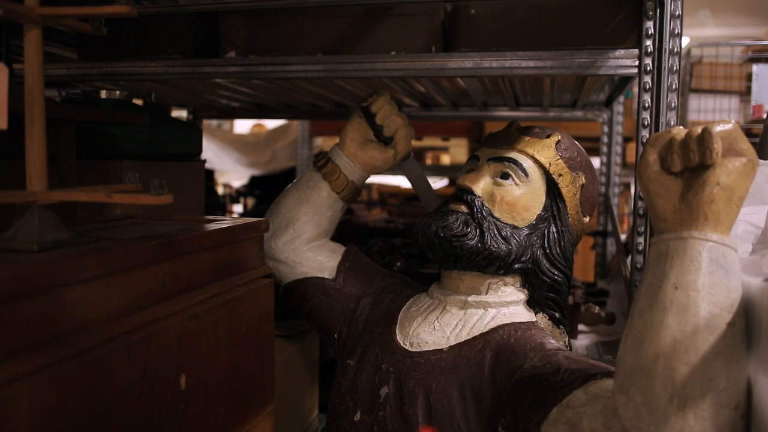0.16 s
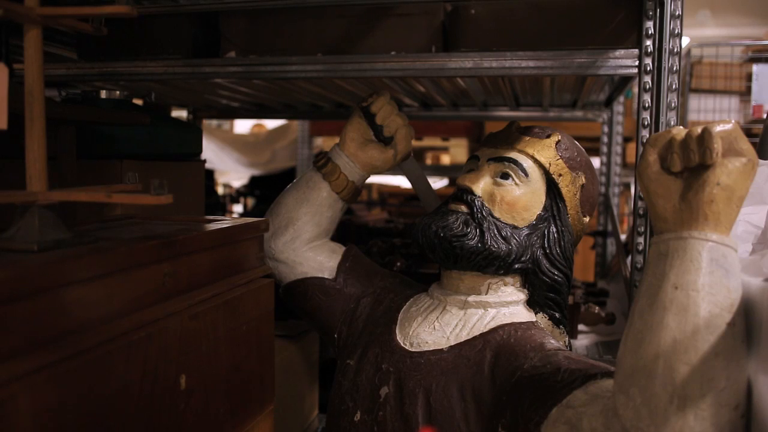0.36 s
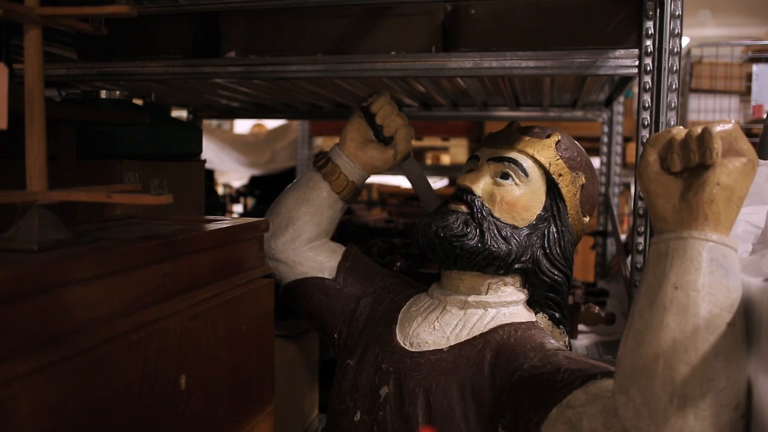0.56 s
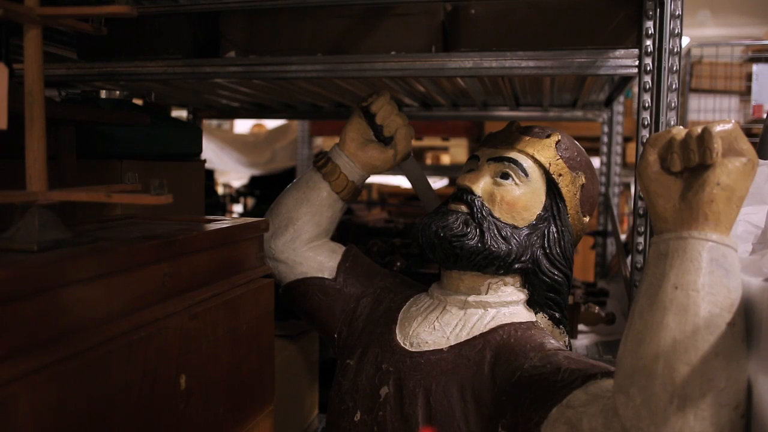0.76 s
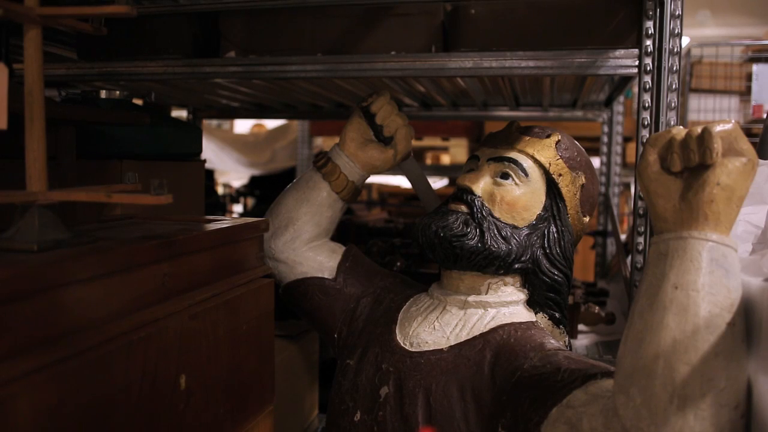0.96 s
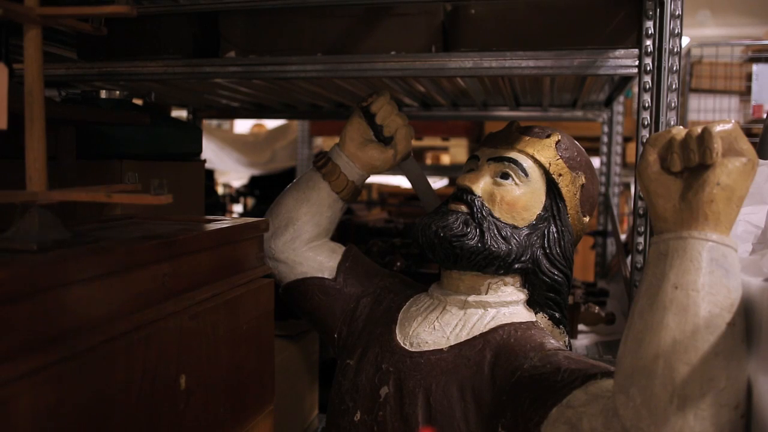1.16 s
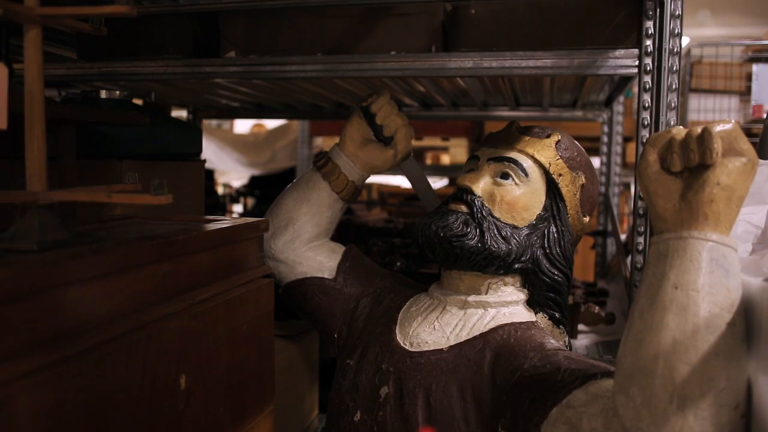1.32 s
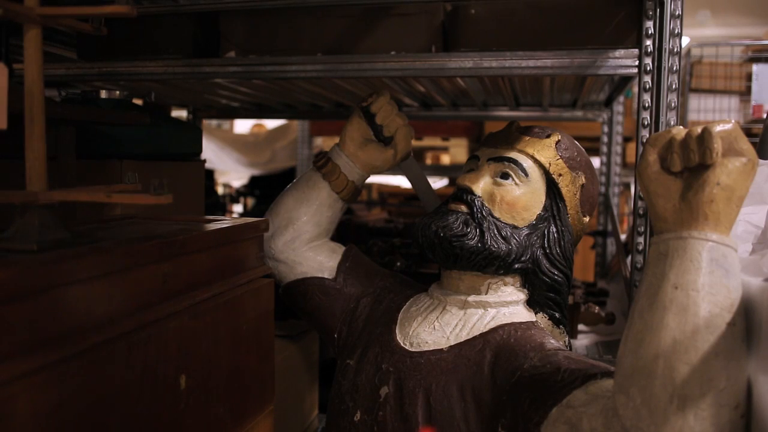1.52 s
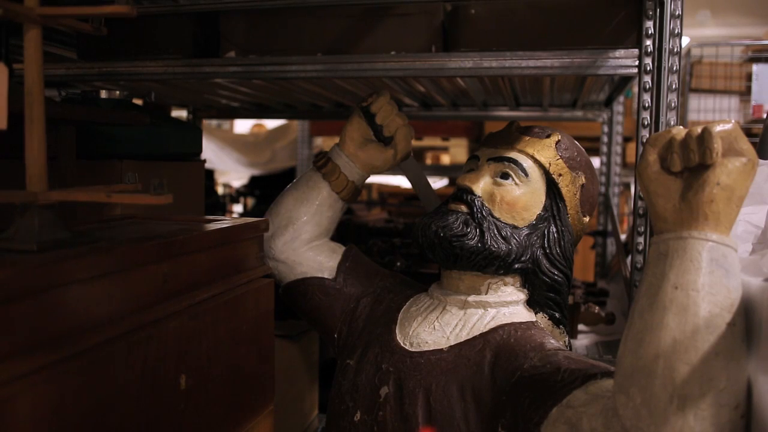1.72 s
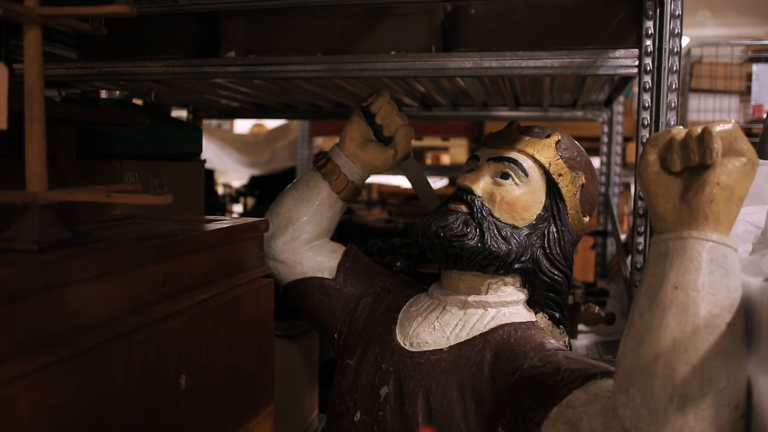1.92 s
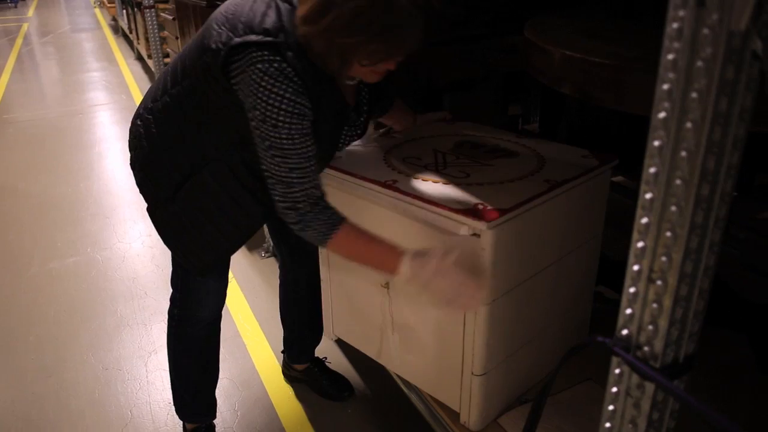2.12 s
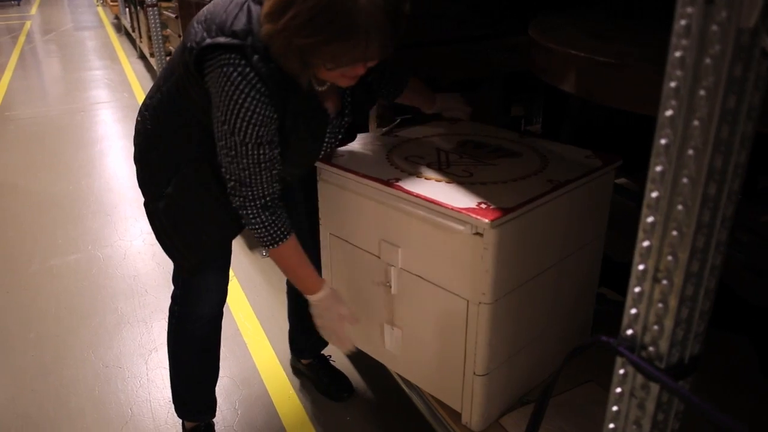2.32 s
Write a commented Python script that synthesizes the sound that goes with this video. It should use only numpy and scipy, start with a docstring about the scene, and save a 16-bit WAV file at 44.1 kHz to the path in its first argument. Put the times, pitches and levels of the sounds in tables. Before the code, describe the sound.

A heavy wooden cabinet drags across a shelf. Cloth rustles softly from 0.1 to 0.85 s over quiet room air; small dull bumps cluster around 1.0-1.27 s. At 1.28 s it cracks loose, then grinds with hollow, gritty, juddering scraping, loudest near 1.85 s, stopping about 2.15 s. A short room tail and faint cloth rustle follow, over growing low rumble and a soft, deep, regular thump.

```python
"""Heavy cabinet dragged across a shelf

Under it lie the room air, shaped noise with a rising low part, and a growing deep sine with a regular thump.
Cloth rustles in fine filtered clicks; small bumps are short dull rings with a noisy edge.
The feet break loose with a crack of shelf modes and a spray of splinter grains, then grind, swell and stop:
random slips shake the modes of the wooden cabinet, with grit on top, and a quiet storage room answers."""
import sys
import numpy as np
from scipy import signal
from scipy.fft import rfft, irfft
from scipy.io import wavfile
from scipy.ndimage import uniform_filter1d

SR = 44100
rng = np.random.default_rng(int(sys.argv[2]) if len(sys.argv) > 2 else 0)


def level_to_linear(level):
    """Convert decibel levels to linear amplitude factors, elementwise."""
    exponent = np.asarray(level, float) / 20
    return 10 ** exponent


def store_pcm(level_fs):
    """Save levels as 16-bit WAV."""
    pcm = np.round(np.clip(level_fs, -1, 1) * 32767).astype(np.int16)
    wavfile.write(sys.argv[1], SR, np.atleast_2d(pcm).T)


N = 109368
TIME = np.arange(N) / SR


def evened(x):
    """Scales to rms 1."""
    return x / np.sqrt(np.mean(x ** 2) + 1e-20)


def rfft_hz(size):
    """Bin frequencies."""
    return np.fft.rfftfreq(size, 1 / SR)


def read(points, hz):
    """Reads a table on a log-frequency axis."""
    f, value = np.transpose(points)
    return np.interp(np.log(hz + 1), np.log(f + 1), value)


def curve(rows, column=1):
    """One column of a table over time, -120 outside it."""
    rows = np.array(rows)
    return np.interp(TIME, rows[:, 0], rows[:, column], -120, -120)


def loudest(tables):
    """The louder of several level curves at each moment."""
    return np.max([curve(rows) for rows in tables], axis=0)


def add(mix, start_s, sound):
    """Mixes a sound in at start_s."""
    part = mix[round(start_s * SR):][:len(sound)]
    part += sound[:len(part)]


def colour(x, spectrum):
    """Causal minimum-phase filter with the given spectrum."""
    log_gain = np.log(level_to_linear(np.maximum(read(spectrum, rfft_hz(8192)), -100)))
    # folding the cepstrum onto positive time makes the filter causal
    cepstrum = irfft(log_gain)
    cepstrum[1:4096] *= 2
    cepstrum[4097:] = 0
    taps = irfft(np.exp(rfft(cepstrum)))[:3072]
    taps = taps.reshape((1,) * (x.ndim - 1) + (-1,))
    return signal.oaconvolve(x, taps, axes=-1)[..., :N]


def ring(modes):
    """Impulse response of each mode: a sine that dies exponentially."""
    t = TIME[:SR // 4]
    return np.array([level_to_linear(db - 60 * t / t60) * np.sin(2 * np.pi * hz * t) for hz, db, t60 in modes])


def grains(per_s, spread_db):
    """Random clicks of both signs; a few are large."""
    chance = rng.random(N)
    boost = np.minimum(rng.exponential(1, N), 5)
    size = rng.standard_normal(N)
    return (chance < per_s / SR) * level_to_linear(spread_db * boost) * size


def wander(seconds):
    """Random curve of rms 1 that shakes at about the given time scale."""
    width = max(round(seconds * SR), 2)
    slow = uniform_filter1d(uniform_filter1d(rng.standard_normal(N), width), width)
    return evened(slow - uniform_filter1d(slow, 5 * width))


# tone of the room air: pitch_hz, level_db (relative)
AIR_TONE = [(20, -25), (50, -0.5), (80, -3.5), (105, -5), (160, -0.5), (210, -7), (250, -10.5), (300, -8),
            (400, -12), (700, -14.5), (2300, -17.5), (6000, -24), (15700, -28)]
# left-right likeness of the air: pitch_hz, likeness (1 = same in both ears)
AIR_LIKENESS = [(60, 0.84), (240, 0.34), (950, 0.46), (3770, 0.056), (15000, 0.034)]
# rise of the low room air, fading out above about 1500 Hz: time_s, gain_db
AIR_RUMBLE = [(0, 0.5), (.4, 2.5), (.9, 5), (2.2, 11), (2.48, 9.5)]
AIR_DB = -67  # before the rumble rises


def air():
    """Room air: partly shared stereo noise with faint patches in time and pitch; its low part drifts."""
    frames, hz = N // 512 + 5, rfft_hz(2048)
    a, b, c, d, patches = rng.standard_normal((frames, 1025, 5)).T
    patches = evened(uniform_filter1d(uniform_filter1d(patches, 20, 0), 6, 1))
    same = np.clip(read(AIR_LIKENESS, hz), -1, 1)[:, None]
    left = a + 1j * b
    right = same * left + np.sqrt(1 - same ** 2) * (c + 1j * d)
    z = np.array([left, right])
    z *= level_to_linear(read(AIR_TONE, hz)[:, None] + 1.6 * patches)
    scale = level_to_linear(AIR_DB) / np.std(signal.istft(z, nperseg=2048, noverlap=1536)[1])
    drift_db = np.interp(np.arange(frames) * 512 / SR, *np.transpose(AIR_RUMBLE))
    z *= level_to_linear(drift_db / (1 + (hz[:, None] / 1500) ** 2))
    noise = signal.istft(z, nperseg=2048, noverlap=1536)[1][:, :N]
    return scale * noise * level_to_linear([[-.6], [.6]])  # leans right


# growth of the hum: time_s, level_db (rms of the tone before it leans right)
HUM_LEVEL = [(0, -71), (.4, -67.5), (1.2, -61), (2.48, -59)]
HUM_HZ = 35.
THUMP_FIRST_S, THUMP_EVERY_S = .266, .3405
THUMP_HZ, THUMP_S, THUMP_DB = 24, .013, 6  # pitch, bell-curve width, gain over the hum before its sine


def hum():
    """Hum: a steady deep sine and a soft bell-shaped thump at a regular pace, both growing."""
    # time from the nearest thump
    near = (TIME - THUMP_FIRST_S + THUMP_EVERY_S / 2) % THUMP_EVERY_S - THUMP_EVERY_S / 2
    bell = np.exp(-.5 * (near / THUMP_S) ** 2)
    thump = level_to_linear(THUMP_DB) * bell * np.sin(2 * np.pi * THUMP_HZ * near)
    tone = np.sin(2 * np.pi * HUM_HZ * TIME)
    level = level_to_linear(np.interp(TIME, *np.transpose(HUM_LEVEL)))
    return level * np.sqrt(2) * (tone - thump) * level_to_linear([[-1.2], [1.2]])


# rustle of the cloth, two passages: time_s, level_db
RUSTLE_LEVEL = [
    [(0.09, -73), (0.14, -65.5), (0.236, -74), (0.352, -62), (0.4, -68.5), (0.406, -82), (0.46, -67.5),
     (0.5, -64), (0.53, -75), (0.558, -73), (0.602, -66.5), (0.658, -78), (0.666, -71), (0.784, -69.5),
     (0.788, -67.5), (0.86, -107)],
    [(2.25, -71.5), (2.286, -67), (2.432, -64), (2.47, -65.5), (2.48, -65)],
]
# tone of the rustle: pitch_hz, level_db (relative)
RUSTLE_TONE = [(240, -38), (400, -5), (682, -7), (777, -12.5), (874, -9), (1240, -4.5), (9000, -15.5),
               (11700, -23.5), (19800, -120)]
# thin high hiss of the cloth, two passages: time_s, level_db
SWISH_LEVEL = [
    [(0.09, -95), (0.132, -75), (0.262, -101), (0.32, -78), (0.396, -90), (0.414, -105), (0.486, -79),
     (0.518, -95), (0.776, -85), (0.8, -91)],
    [(2.1, -80), (2.25, -74.5), (2.462, -77), (2.48, -74)],
]
# tone of the hiss: pitch_hz, level_db (relative)
SWISH_TONE = [(4000, -20.5), (6500, -4.5), (9000, -4.5), (11500, -9.5), (15000, -12.5)]
# fibres snap: start_s, level_db
FIBRE_TICKS = [(.312, -49), (0.353, -55), (.357, -49)]


def cloth():
    """Cloth: moving sleeves rub in fine grains, part shared and part wide, and a few fibres snap."""
    near = grains(5000, 3.0)
    wide = np.array([grains(7000, 2.4), grains(7000, 2.4)])
    rub = evened(near) + 1.14 * evened(wide)
    rustle = level_to_linear(loudest(RUSTLE_LEVEL)) * evened(colour(rub, RUSTLE_TONE))
    swish = level_to_linear(loudest(SWISH_LEVEL)) * evened(colour(rub, SWISH_TONE))
    ticks = np.zeros(N)
    tick = ring([(2350, 3, 0.002), (4170, -14, 0.0018)]).sum(0)
    for start_s, db in FIBRE_TICKS:
        add(ticks, start_s, level_to_linear(db) * tick)
    return (rustle + swish + ticks) * level_to_linear([[-1.5], [1.5]])


# small dull bumps: start_s, level_db, pitch_hz, t60_s, edge_db (re level)
SMALL_BUMPS = [(0.034, -42, 316, 0.012, -12), (0.053, -54.5, 440, 0.022, -19),
               (0.794, -58.5, 945, 0.061, -20), (.99, -59.5, 570, 0.066, -16),
               (1.012, -58.5, 430, 0.13, -9), (1.088, -53, 607, 0.065, -22), (1.096, -50, 580, 0.03, -28),
               (1.116, -54, 672, 0.066, -21), (1.121, -47, 383, 0.063, -25), (1.136, -55, 1087, 0.043, -24),
               (1.131, -47.5, 172, 0.061, -30), (1.15, -51, 339, 0.098, -33),
               (1.167, -52.5, 894, 0.036, -14), (1.183, -55, 334, 0.074, -15),
               (1.208, -52.5, 282, 0.027, -19), (1.269, -48, 250, 0.017, -11.5)]
# tone of their noisy edge: pitch_hz, level_db (relative)
EDGE_TONE = [(200, -1), (500, 3.5), (1500, -7.5), (4000, -13.5), (6000, -26), (12000, -54)]
EDGE_T60_S = 0.12


def bumps():
    """Bumps: each is a short dull ring with a pair of neighbouring partials and a dying noisy edge."""
    out, t = np.zeros(N), TIME[:SR // 5]
    noise = evened(colour(rng.standard_normal(N), EDGE_TONE))
    phases = rng.random((len(SMALL_BUMPS), 2))
    for (start_s, db, hz, t60, edge_db), phase in zip(SMALL_BUMPS, phases):
        tone = np.cos(2 * np.pi * hz * t)
        for ratio, p in zip((.7, 1.55), phase):
            tone += 0.24 * np.cos(2 * np.pi * (hz * ratio * t + 0.42 * p))
        body = np.minimum(t / 0.0002, 1) * level_to_linear(-60 * t / t60) * tone
        edge = level_to_linear(edge_db - 60 * t / EDGE_T60_S) * noise[round(start_s * SR):][:len(t)]
        add(out, start_s, level_to_linear(db) * (body + edge))
    return out


# the feet break loose: start_s, peak_db (of each snap alone, dry)
FOOT_SNAPS = [(1.2792, -35), (1.2816, -27.5), (1.285, -43.5), (1.291, -41), (1.304, -56)]
# modes of the shelf: pitch_hz, level_db (relative)
SHELF_MODES = [(446, -5), (670, -11), (790, -6.5), (880, -1), (965, 2.5), (1225, -2), (1330, -12),
               (1700, -6), (2100, -6.5), (2515, -5), (2900, -10), (3385, -9.5), (4155, -7.5), (4690, -2),
               (5115, -9), (5565, -16), (6050, -20), (6570, -18)]
# tone of the splinters: pitch_hz, level_db (relative)
SPLINTER_TONE = [(600, -51), (1500, 12.5), (4000, 0.5), (8000, -11), (15500, -24)]
SHELF_T60_S = .045  # at 1 kHz, shorter with the root of pitch
SNAP_RISE_S = .0012
SPRAY_DB, SPRAY_T60_S = -44.5, .15


def crack():
    """Crack: snaps ring the modes of the shelf and the first leaves a short spray of splinter grains."""
    out = np.zeros(N)
    modes = [(hz, db, SHELF_T60_S * np.sqrt(1000 / hz)) for hz, db in SHELF_MODES]
    snap = ring(modes).sum(0)
    snap *= np.minimum(TIME[:len(snap)] / SNAP_RISE_S, 1)
    for start_s, db in FOOT_SNAPS:
        add(out, start_s, level_to_linear(db) * snap / abs(snap).max())
    after = TIME - FOOT_SNAPS[0][0]
    fall = np.clip(after / 0.0014, 0, 1) * level_to_linear(SPRAY_DB - 60 * abs(after) / SPRAY_T60_S)
    return out + evened(colour(grains(12000, 2.2), SPLINTER_TONE)) * fall


FAVOUR_DB, FAVOUR_OCTAVES = 13, .11  # boost of the modes near the contact pitch, bell-curve width


def favoured(modes, rows, column):
    """Level curve of each mode: those near the pitch of the contact are shaken most."""
    centre = np.maximum(curve(rows, column=column), 100)
    levels_db = []
    for hz, _, _ in modes:
        bell = np.exp(-.5 * (np.log2(hz / centre) / FAVOUR_OCTAVES) ** 2)
        levels_db.append(curve(rows) - 8 + FAVOUR_DB * bell)
    return levels_db


SLIPS_PER_S, SLIP_SPREAD_DB = 2500, 3.5
JUDDER_DB, JUDDER_S = 1.6, .008  # quick unevenness of the slips
LUMP_DB, LUMP_S = 2.5, .025  # each mode swells and sinks on its own


def shake(modes, levels_db):
    """Each mode rings to its own train of slips, all scaled together before the level curves."""
    taps = ring(modes)
    trains = []
    for _ in taps:
        slips = grains(SLIPS_PER_S, SLIP_SPREAD_DB)
        trains.append(slips * level_to_linear(JUDDER_DB * wander(JUDDER_S) + LUMP_DB * wander(LUMP_S)))
    norm = np.sqrt(sum(np.mean(s ** 2) * np.sum(r ** 2) for s, r in zip(trains, taps)))
    return sum(signal.oaconvolve(s * level_to_linear(db), r)[:N] for s, r, db in zip(trains, taps, levels_db)) / norm


# a short first shift, then the slide: time_s, body_db, grit_db (re body), contact_hz (modes shaken most)
SLIDE_MOVES = [(1.085, -76, -17, 400), (1.12, -66.5, -16, 412), (1.19, -65.5, -22, 366),
               (1.23, -72.5, -13, 350), (1.275, -59, -22, 390), (1.3, -46.5, -29, 775),
               (1.345, -53.5, -24, 754), (1.39, -45.5, -12, 755), (1.45, -45, -11, 753),
               (1.56, -43, -13, 731), (1.59, -48, -9, 680), (1.62, -43.5, -12, 680),
               (1.65, -44, -10.5, 965), (1.72, -42, -11, 910), (1.76, -41, -11.5, 412),
               (1.8, -40.5, -11, 750), (1.83, -40.5, -9, 977), (1.845, -34.5, -16, 514),
               (1.9, -37, -12.5, 431), (1.96, -38, -12.5, 764), (2.02, -38, -10, 412),
               (2.075, -40.5, -16, 559), (2.12, -51.5, -24, 425), (2.17, -73, -10, 397),
               (2.21, -75, 7, 400), (2.27, -77, -7, 400)]
# boom of the carcass, first lean to stop: time_s, level_db, contact_hz (modes shaken most)
CARCASS_MOVES = [(1.07, -76, 200), (1.12, -54, 276), (1.172, -51.5, 282), (1.23, -70, 234),
                 (1.406, -50, 244), (1.5, -49.5, 130), (1.585, -46.5, 129), (1.65, -48, 280),
                 (1.728, -56.5, 219), (1.754, -48, 206), (1.78, -56.5, 231), (1.862, -47.5, 248),
                 (1.922, -54.5, 218), (1.97, -44.5, 210), (2.05, -48, 127), (2.13, -43.5, 212),
                 (2.18, -52.5, 221), (2.2, -64, 133), (2.27, -84, 135)]
# low modes of the cabinet: pitch_hz, level_db (relative), t60_s
BOOM_MODES = [(111.6, -6, 0.3), (131.6, 1, 0.17), (210.4, -4.5, 0.19), (231.3, 1, 0.12),
              (284.4, -4.5, 0.084)]
# middle modes of the cabinet: pitch_hz, level_db (relative), t60_s
BODY_MODES = [(352, -5, 0.11), (410.7, 1, 0.091), (491.5, -3, 0.051), (581.6, -3.5, 0.066),
              (676, -2, 0.097), (753.2, -2, 0.072), (885, 5, 0.029), (966, -1, 0.074), (1114, -10, 0.047),
              (1239, -2, 0.056), (1410, -4.5, 0.077), (1840, -5, 0.021)]
# body colour between the modes: pitch_hz, level_db (relative)
BETWEEN_TONE = [(150, -33.5), (250, -6.5), (317, -7), (416, -9.5), (961, -5.5), (2200, -19.5), (2860, -35),
                (4840, -120)]
# tone of the grit: pitch_hz, level_db (relative)
GRIT_TONE = [(1000, -28), (1700, -3), (2290, -4.5), (3020, -9), (4170, -11), (5760, -19.5), (12600, -33.5),
             (15500, -44)]
BETWEEN_DB = -6.5  # re body


def slide():
    """Slide: feet slip at random, modes near the moving contact pitch ring most, grit hisses on top."""
    level = curve(SLIDE_MOVES)
    slips = grains(SLIPS_PER_S, SLIP_SPREAD_DB) * level_to_linear(JUDDER_DB * wander(JUDDER_S))
    broad = level_to_linear(level + BETWEEN_DB) * evened(colour(slips, BETWEEN_TONE))
    hiss = evened(colour(slips + 4.8 * grains(9000, 1.15), GRIT_TONE))
    grit = level_to_linear(level + curve(SLIDE_MOVES, column=2)) * hiss
    body = shake(BODY_MODES, favoured(BODY_MODES, SLIDE_MOVES, column=3))
    boom = shake(BOOM_MODES, favoured(BOOM_MODES, CARCASS_MOVES, column=2))
    return body + broad + boom + grit


# decay of the room: pitch_hz, t60_s
ROOM_DECAY = [(150, 0.51), (600, 0.47), (2500, 0.46), (9000, 0.66)]
FIRST_ECHO_S = .006


def room(x):
    """Room: sparse echoes of random sign, each band dying at its own speed, slightly shared by the ears."""
    taps = np.zeros((2, SR // 2))
    at = np.arange(260, SR // 2 - 20, 20)
    at = at + rng.integers(0, 20, (2, len(at)))
    np.put_along_axis(taps, at, rng.choice([-1., 1.], at.shape), 1)
    hz, t, z = signal.stft(taps, SR, nperseg=256)
    decay = level_to_linear(-60 * t / read(ROOM_DECAY, hz)[:, None])
    tail = signal.istft(z * decay, SR, nperseg=256)[1]
    tail = (tail + 0.15 * tail[::-1]) * (TIME[:tail.shape[1]] > FIRST_ECHO_S)
    return signal.fftconvolve(x[None], tail / np.linalg.norm(tail[0]), axes=1)[:, :N]


# the room answers treble more: pitch_hz, gain_db
WET_TONE = [(100, -8.5), (400, 1.5), (1000, 3), (3000, 5.5), (9000, 4)]
# stereo lean of the cabinet and its room: pitch_hz, left_minus_right_db
STEREO_LEAN = [(60, -21), (150, 3), (500, -3), (1000, -0.2), (2000, 0.6), (5000, 1)]
DRAG_ROOM_DB, HIT_ROOM_DB = -6, -7  # sends to the room
LOW_EDGE_HZ = 82


def scene():
    """Mix: the cabinet and its room lean to one side or the other by pitch, over cloth, air and hum."""
    high = signal.butter(4, LOW_EDGE_HZ, "high", fs=SR, output="sos")
    hits = signal.sosfilt(high, crack() + bumps())
    drag = signal.sosfilt(high, slide())
    send = level_to_linear(DRAG_ROOM_DB) * drag + level_to_linear(HIT_ROOM_DB) * hits
    cabinet = hits + drag + room(colour(send, WET_TONE))
    lean = level_to_linear(np.outer([.5, -.5], read(STEREO_LEAN, rfft_hz(N))))
    return irfft(rfft(cabinet) * lean, N) + cloth() + air() + hum()


def band_limit(x):
    """A steep low-pass at the top of the band."""
    return signal.sosfilt(signal.butter(12, 15760, fs=SR, output="sos"), x)


def record(dry):
    """Delivers the finished mix."""
    return band_limit(dry)


dry = scene()
out = record(dry)
store_pcm(out)
```